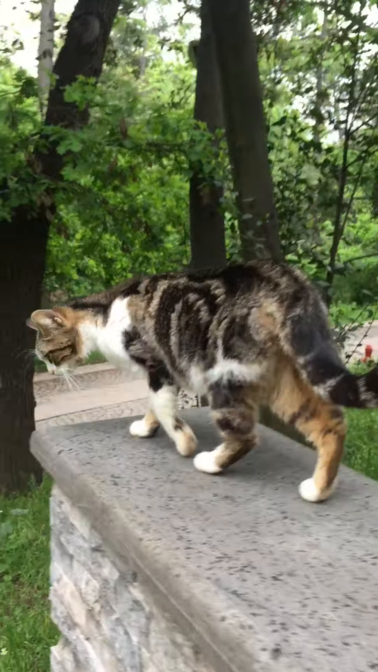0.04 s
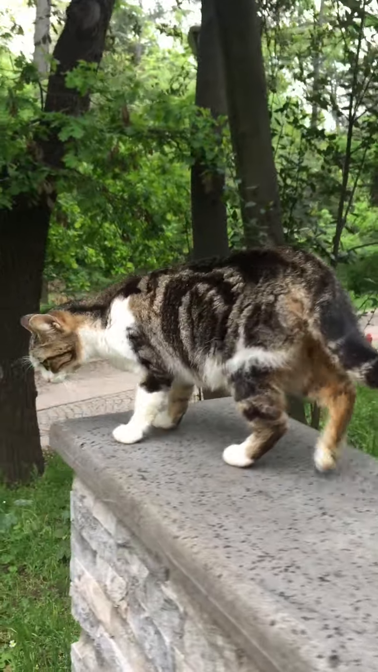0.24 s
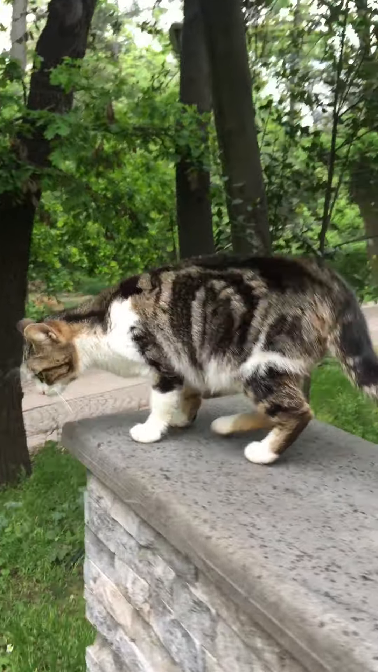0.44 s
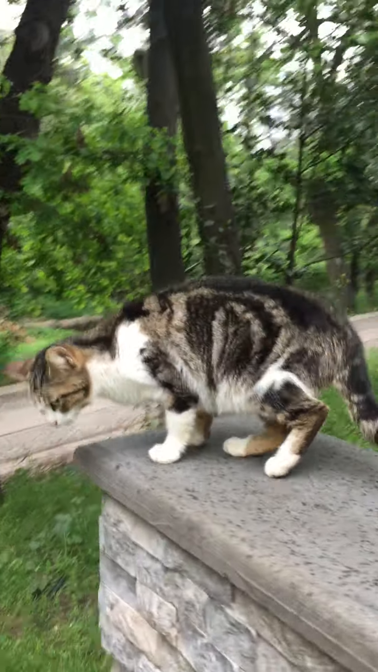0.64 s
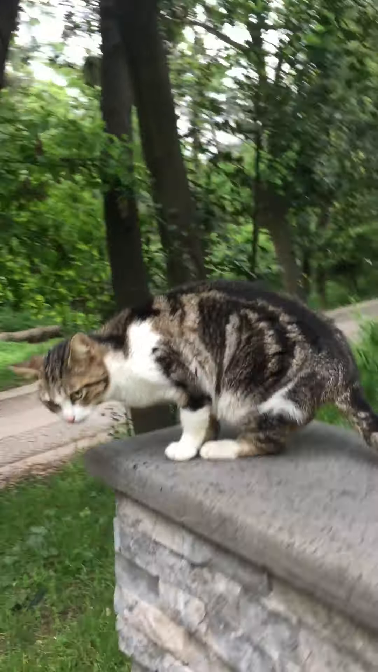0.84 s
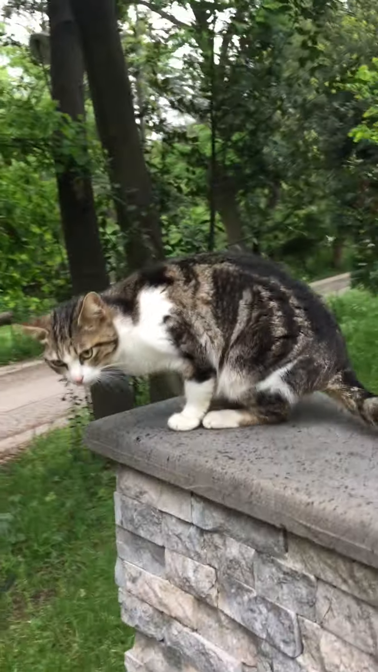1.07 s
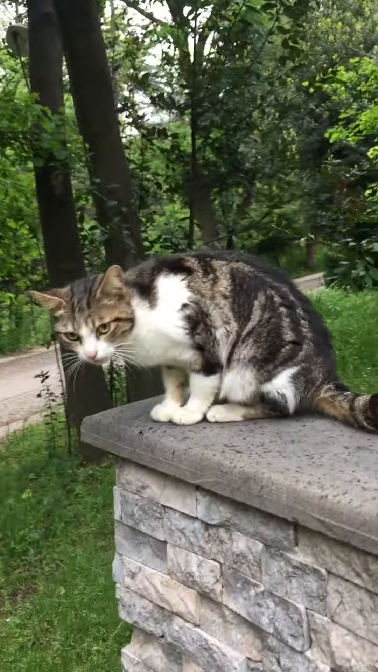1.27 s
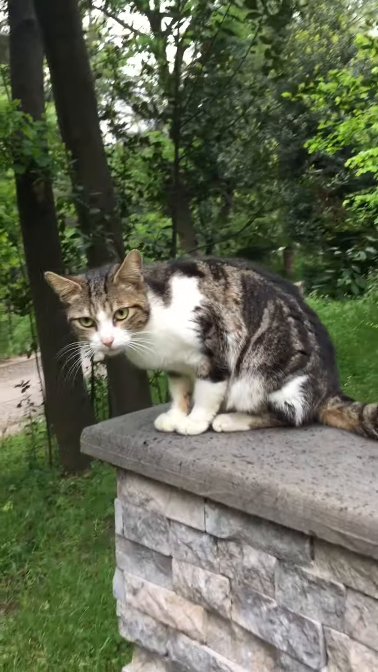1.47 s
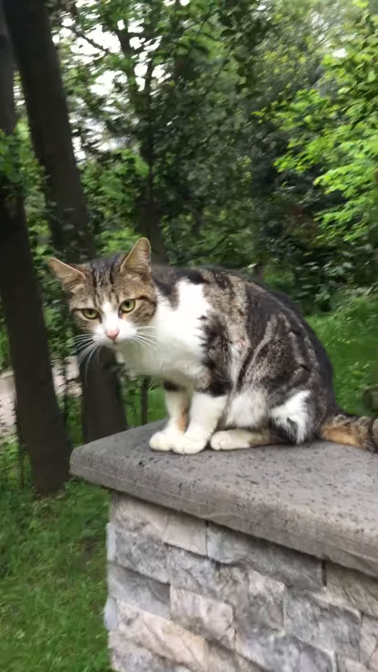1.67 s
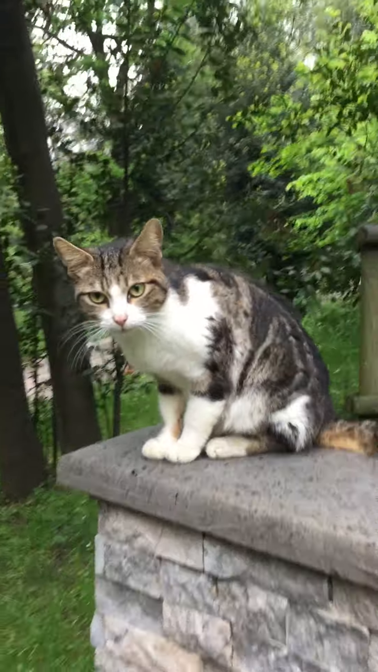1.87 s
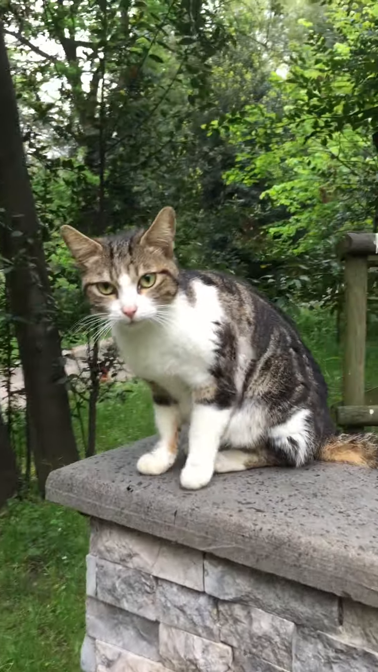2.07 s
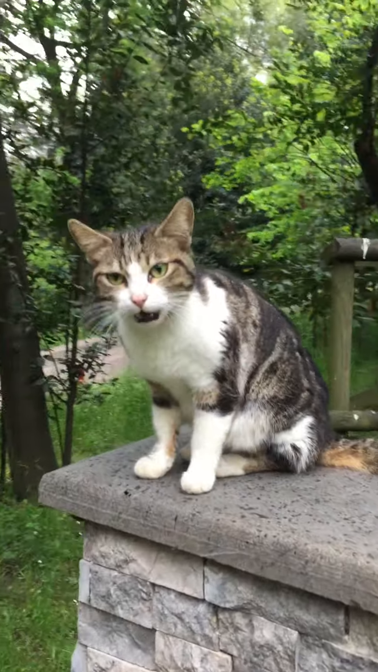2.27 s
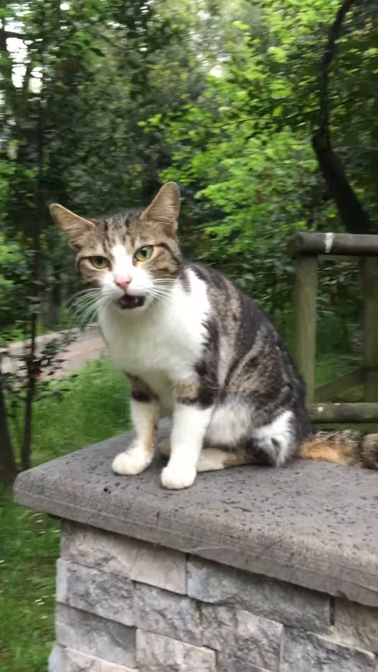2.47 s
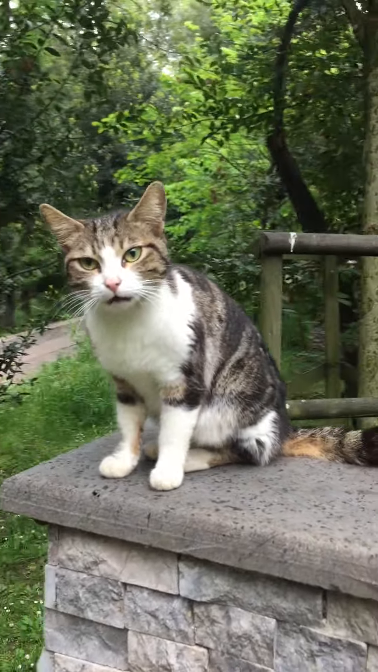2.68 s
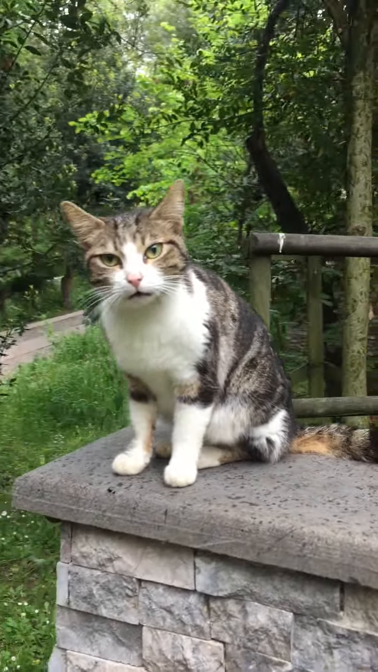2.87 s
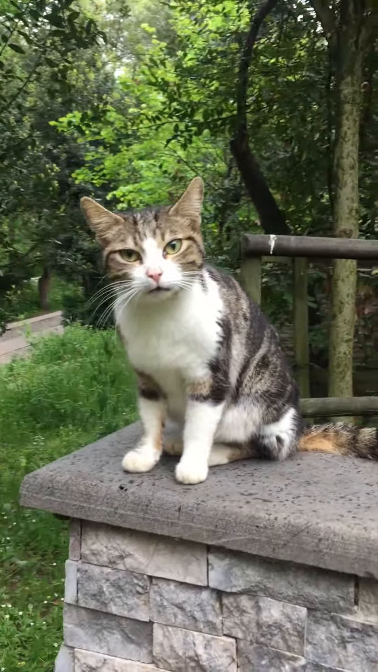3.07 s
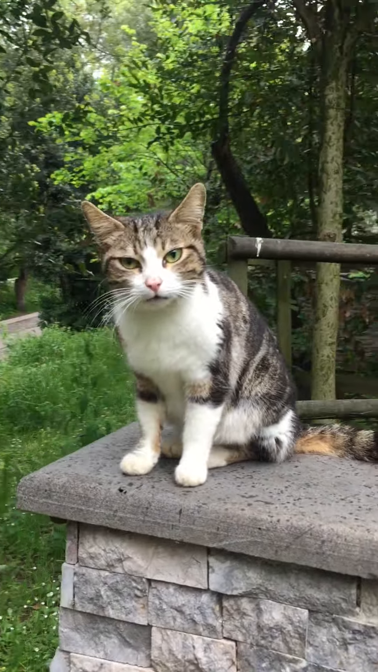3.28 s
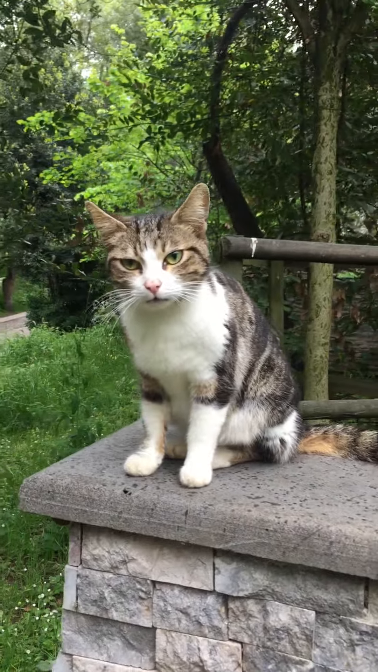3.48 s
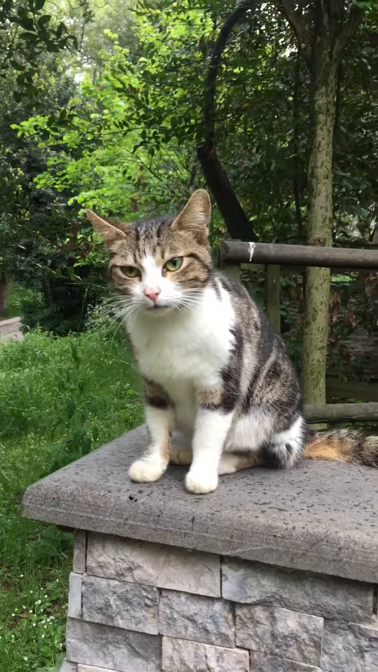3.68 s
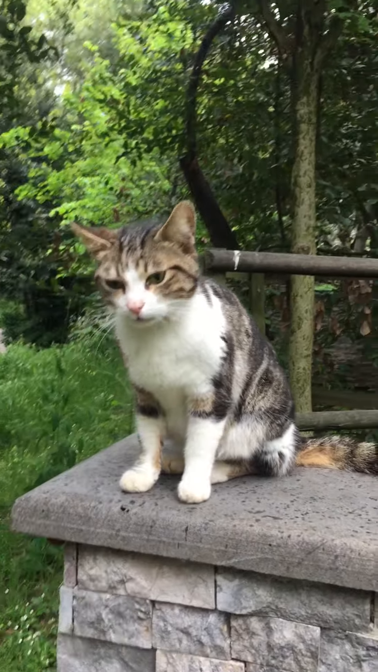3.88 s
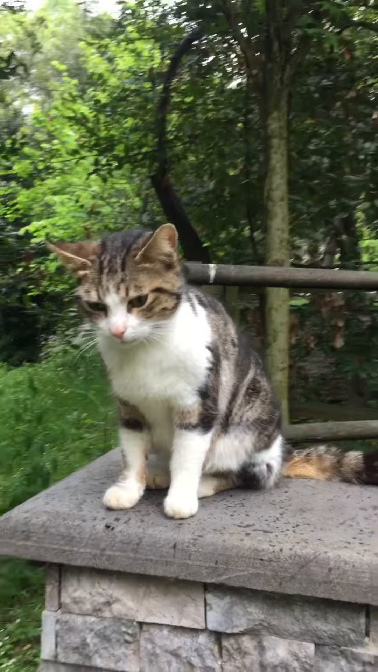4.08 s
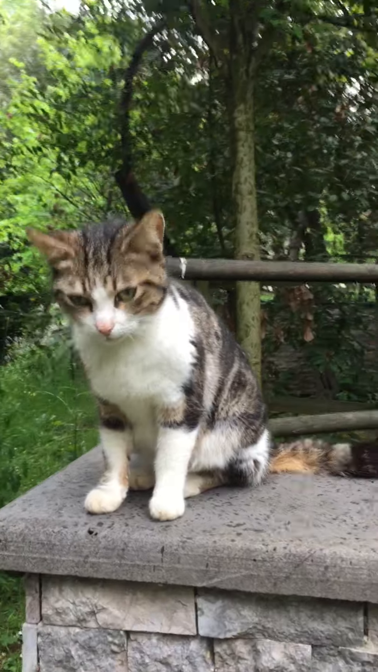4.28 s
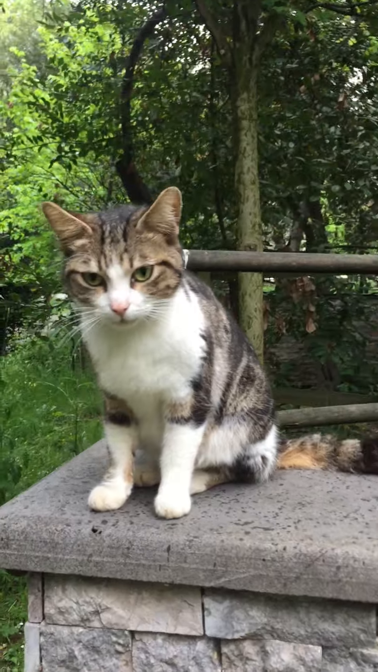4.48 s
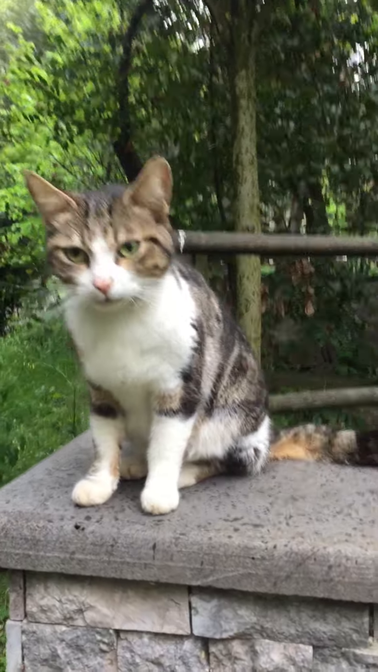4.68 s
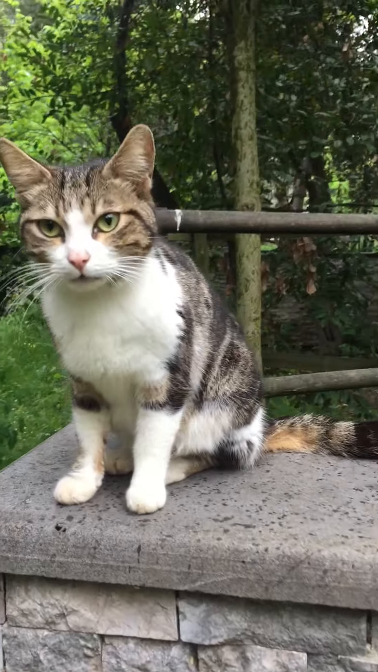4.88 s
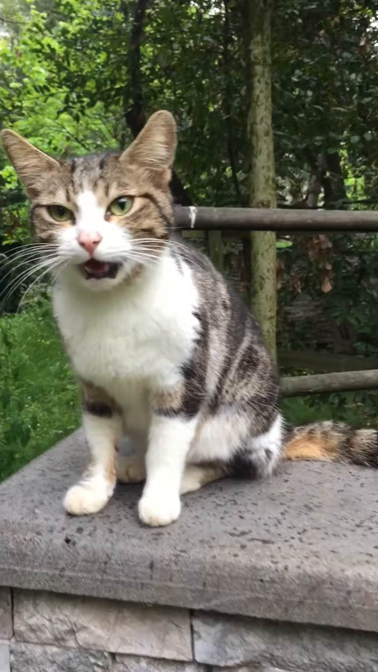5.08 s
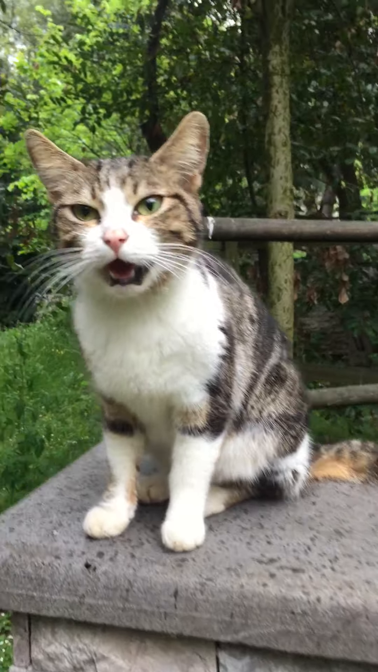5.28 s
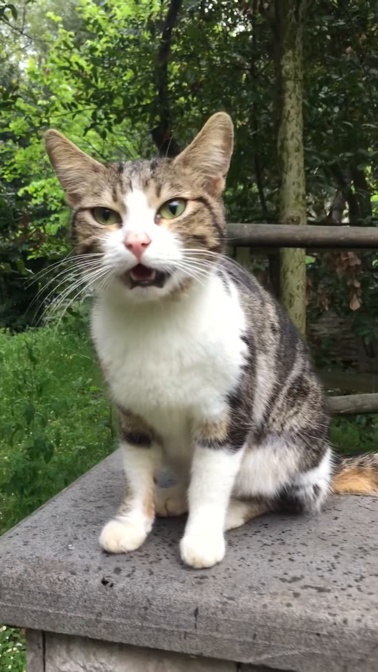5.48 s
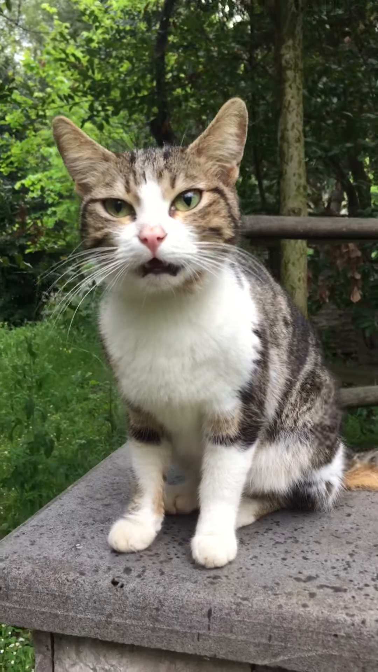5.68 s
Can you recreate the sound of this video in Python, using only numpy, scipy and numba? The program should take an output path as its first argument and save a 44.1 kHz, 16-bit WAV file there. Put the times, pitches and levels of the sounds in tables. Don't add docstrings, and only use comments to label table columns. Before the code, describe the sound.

A quiet park with a steady, soft low rumble of far traffic, faint wavering engine drones and gear whine. A tiny tick opens it, and a very thin high bird whistle comes at about 0.8 s. From 1.3 to 2.2 s a bird gives four short, slightly falling notes, the middle two clearer, with little chips among them. A small lip tick at 2.36 s leads into the cat's first meow, 2.4 to 3.0 s: close, low, rough and creaky, rising briefly, then sinking to a croak with a soft lip smack. Faint leaf stirs and chips follow, with a high bird chip and whistle near 4.2 s. From 4.6 s a low lorry idle slowly nears. Faint sniffs of drawn breath at 5.0 and 5.2 s precede the second meow at 5.26 s: louder, higher, pinched at first, then wide open and raspy, sagging in pitch until the abrupt end around 5.7 s.

```python
import sys
import numpy as np
from scipy import signal
from scipy.fft import rfft, irfft, next_fast_len
from scipy.io import wavfile
from scipy.ndimage import uniform_filter1d
from numba import njit

SR = 44100
rng = np.random.default_rng(int(sys.argv[2]) if len(sys.argv) > 2 else 0)


def pcm_store(signal):
    levels = np.round(np.clip(np.atleast_2d(signal), -1, 1) * 32767)
    wavfile.write(sys.argv[1], SR, levels.astype(np.int16).T)


def gain_from_db(level_db):
    decades = np.asarray(level_db, float) / 20
    return 10 ** decades


N = 253134
T = np.arange(N) / SR

# start in seconds, end in seconds.
MEOW_SPANS = [(2.412, 2.97), (5.264, 5.74)]
# time in seconds, fold pulse rate in Hz.
PITCH = [
    [(2.412, 222.2), (2.458, 234.9), (2.52, 237.3), (2.548, 280), (2.672, 261.5), (2.748, 190.8),
     (2.81, 191.5), (2.844, 154.6), (2.97, 154.4)],
    [(5.264, 306), (5.306, 324.6), (5.344, 290.3), (5.53, 274.8), (5.56, 251.2), (5.588, 252),
     (5.646, 210.8), (5.69, 206.5), (5.74, 165)],
]
# time in seconds, level in dB, press in dB (how hard the folds snap shut).
EFFORT = [
    [(2.412, -72, 3), (2.426, -57, 7), (2.448, -48, 0.5), (2.642, -46, -3), (2.726, -47, -14),
     (2.838, -49, -18.5), (2.884, -56, -12), (2.94, -51.5, -26), (2.97, -59, -1)],
    [(5.264, -64.5, 1.5), (5.298, -50.5, 4), (5.322, -44.5, -1), (5.37, -41.5, 0.6), (5.534, -40, -3),
     (5.625, -40.5, -6.5), (5.676, -42.5, -7), (5.712, -45, -8.5), (5.74, -47.5, -7.5)],
]
# time in seconds, lip rounding 0-1, jaw opening 0-1.
MOUTH_SHAPE = [
    [(2.412, 0.1, 0), (2.482, 0.3, 0.18), (2.62, 0.28, 0.79), (2.736, 0.83, 0.95), (2.902, 1, 0.56),
     (2.97, 1.02, 0.5)],
    [(5.264, 0, .01), (5.304, .01, .01), (5.372, 0, 0.21), (5.496, 0.33, 0.37), (5.556, 0.29, 0.9),
     (5.74, 0.7, .98)],
]
# start in Hz, end in Hz, width in Hz, level in dB under the fourth resonance.
UPPER_MOUTH = [
    [(5450, 6150, 1300, -4), (6800, 6700, 1400, -3.5), (7600, 8400, 1400, -6.5), (9500, 9800, 1100, -14)],
    [(5300, 4120, 900, -7), (6940, 6000, 890, -2.5), (8540, 7200, 650, -7.5), (8550, 8260, 1600, -10)],
]
# throat resonance in Hz, fourth resonance in Hz with the jaw shut.
TRACT = [(1030, 4110), (1080, 3900)]
STEADY = [(.014, .13), (.006, .06)]
# time in seconds, half length in seconds, extra period scatter share.
STUMBLES = [(2.42, .04, .022), (2.49, .02, .022), (2.54, .035, .07), (2.61, .04, .06), (2.705, .045, .05),
            (2.78, .028, .03), (2.97, .15, .08), (5.26, .09, .045), (5.422, .017, .075), (5.465, .014, .03),
            (5.5, .014, .05), (5.648, .018, .035), (5.74, .04, .045)]
# held in seconds, strength 0-1, stall depth in dB.
PINCH = [(0.001, .3, 6), (0.034, .98, 14)]
# centre in Hz, width in Hz, level in dB.
TEETH_HISS = [(11250, 840, -40), (13000, 900, -37), (14900, 1500, -41)]
# ring in Hz, width in Hz, level in dB.
LIP_SMACK = [(380, 37, -49.5), (1860, 1200, -55.5), (4290, 100, -59), (6400, 2100, -61.5)]
# time and rise in seconds, centre and width in Hz, dB.
INTAKE = [
    (5.019, .006, 4400, 9100, -66),
    (5.2, 0.027, 3620, 1800, -68.5),
]
# start in seconds, start pitch in Hz, level in dB.
CALLS = [
    (1.305, 2070, -62),
    (1.571, 2037, -55.5),
    (1.87, 2022, -55),
    (2.151, 2020, -60.5),
]
# start in seconds, start pitch in Hz, level in dB.
CHIPS = [
    (1.623, 1926, -57),
    (1.93, 2860, -72),
    (3.13, 2850, -70),
    (3.449, 2800, -70),
    (4.052, 3180, -62.5),
    (4.192, 7600, -63),
]
# start in seconds, start pitch in Hz, glide share, level in dB.
SEEPS = [
    (.823, 7700, .003, -65),
    (0.899, 7570, -0.0028, -73),
    (4.159, 7530, 0.0042, -64),
]
# time in seconds, centre in Hz, width in Hz, level in dB.
TICKS = [(.0036, 3600, 15000, -63), (.25, 11000, 4000, -73), (.655, 5800, 2500, -74),
         (2.36, 2750, 397, -65), (2.362, 11500, 3100, -67), (2.366, 4640, 5000, -68.5),
         (3.067, 804, 900, -59), (3.985, 5300, 3000, -75), (4.841, 5400, 6000, -66),
         (5.525, 13900, 3000, -70)]
# time in seconds, centre in Hz, width in Hz, level in dB.
STIRS = [(2.9, 3700, 810, -65), (3.0, 6300, 380, -73.5), (3.76, 6800, 900, -80), (4.06, 3600, 590, -69.5)]
# start in seconds, end in seconds, pitch in Hz, level in dB.
DRONES = [(-.2, .3, 185, -58), (1.2, 1.6, 285, -60), (2.6, 3.0, 298, -60), (2.7, 2.88, 193, -53),
          (3.7, 4.35, 192, -53), (.72, .88, 435, -63), (-.2, .7, 1080, -68), (.75, 1.05, 1190, -68),
          (1.06, 1.45, 1040, -68), (1.75, 2.5, 1000, -69), (3., 3.6, 965, -72), (.3, .9, 720, -72),
          (1.3, 1.6, 780, -70), (1.74, 1.94, 1520, -70), (.45, .75, 1620, -72), (1.02, 1.13, 1800, -71),
          (1.12, 1.3, 1460, -73), (3.2, 3.5, 1380, -74), (3.9, 4.3, 1400, -73)]
# frequency in Hz, level in dB per Hz.
TOWN_COLOUR = [(12, -62), (20, -33), (30, -48), (45, -2), (92, 1), (126, -6.5), (171, -7.5), (252, -10.5),
               (478, -25), (746, -27.5), (958, -24.5), (1270, -28.5), (2840, -43), (3080, -45.5),
               (15500, -59)]

THROAT_WIDTH_HZ, THROAT_SKIRT_HZ = (232, 115, 250), (440, 1600, 1100)
CHEST_HZ, CHEST_WIDTH_HZ, CHEST_DB = 560, 200, -17
FOURTH_WIDTH_HZ, FOURTH_OPEN_HZ = 260, 363
FOURTH_KEEPS = .25
SPREAD_HZ, ROUND_HZ = (1993, 3040), (1637, 2670)
TOP_SHUT_HZ, TOP_OPEN_HZ = 6560, 11500
OVER_DB, PRESS_SHARES = (3.5, 0, -3), (0.58, 0.51, 1)
WAVER_DB, WAVER_SHARE = 1.2, .005
RASP_SHARES, RASP_CYCLE = (.48, .4), .13
SIZE_DB, SIZE_DB_PER_SCATTER, BREATH_PER_SCATTER = .5, 22, 1.5
PINCH_RELEASE_S, PINCH_DB, PINCH_SHIFTS = .02, (11, 9), (-0.072, 0.066, -0.11, 0.18)
STALL_PERIOD_S, STALL_SETTLE_S = .0093, 0.017
WALL_LAG_S, WALL_DB = 0.00128, -18
ECHO_T60_S, ECHO_DB = .3, -22
CALL_S, CALL_GLIDE, CALL_OVER_DB = 0.079, -0.0432, -21.5
CHIP_S, CHIP_GLIDE, CHIP_OVER_DB = 0.035, -0.088, -30
SEEP_S, SEEP_OVER_DB, WARBLE_SHARE = 0.088, -40, .005
SMACK_S, SMACK_RISE_S, SMACK_FALL_S = 2.966, 0.014, 0.015
TICK_RISE_S, TICK_FALL_S, STIR_S, INTAKE_FALL_S = 0.0032, 0.0048, 0.021, 0.16
LORRY_FROM_S, LORRY_HZ, LORRY_DB, LORRY_DB_PER_S = 4.58, 69.6, -52, 3
TOWN_DB, DRONE_SAG, DRONE_WIDTH = -46.5, .04, .065
MIC_DIP_HZ, MIC_DIP_WIDTH_HZ, MIC_DIP_DEPTH = 10440, 610, 0.64


def unit(x):
    return x / np.sqrt(np.mean(x ** 2))


def read(table, t):
    s, *columns = np.transpose(table)
    return [np.interp(t, s, c) for c in columns]


def walk(rate):
    hold = int(SR / rate)
    steps = np.repeat(rng.standard_normal(N // hold + 1), hold)
    return unit(uniform_filter1d(uniform_filter1d(steps, hold), hold)[:N])


@njit
def svf(x, hz, width):
    band, low, b, l = np.empty(len(x)), np.empty(len(x)), 0., 0.
    for i in range(len(x)):
        g, k = np.tan(np.pi * hz[i] / SR), width[i] / hz[i]
        v = (b + g * (x[i] - l)) / (1 + g * (g + k))
        band[i], low[i] = k * v, l + g * v
        b, l = 2 * v - b, l + 2 * g * v
    return band, low


def ring(x, hz, width_hz):
    return svf(x, hz + 0 * x, width_hz + 0 * x)[0]


def resonance(x, hz, width_hz, skirt_hz):
    return unit(ring(ring(x, hz, width_hz), hz, skirt_hz))


@njit
def folds(hz, scatter, size_db, chance):
    pulses, phase, p, k = np.zeros(len(hz) + 1), np.empty(len(hz)), .9, 0
    for i in range(len(hz)):
        step = hz[i] * np.exp(scatter[i] * chance[k, 0]) / SR
        p += step
        if p >= 1:
            p, k = p - 1, k + 1
            size = 10 ** (size_db[i] * chance[k, 1] / 20) * np.sqrt(SR / hz[i])
            pulses[i] += size * p / step
            pulses[i + 1] += size * (1 - p / step)
        phase[i] = p
    return pulses[:-1], phase


def fold_sound(t, pitch, steady, rasp_share):
    scatter = steady[0]
    for s, half, more in STUMBLES:
        scatter = scatter + more * np.clip(1 - np.abs(t - s) / half, 0, 1)
    size_db = SIZE_DB + SIZE_DB_PER_SCATTER * scatter
    breath = steady[1] + BREATH_PER_SCATTER * scatter
    pulses, phase = folds(read(pitch, t)[0], scatter, size_db, rng.standard_normal((400, 2)))
    air = breath * rng.standard_normal(len(t)) * 2 * np.exp(-phase / .8)
    drive = pulses + air
    rasp = unit(rng.standard_normal(len(t)) * np.exp(-phase / RASP_CYCLE))
    spit = (1 - rasp_share) * drive + rasp_share * rasp
    return drive, air, spit


def throat_sound(drive, centres, levels_db):
    throat = 0
    for k in range(3):
        tone = resonance(drive, centres[k], THROAT_WIDTH_HZ[k], THROAT_SKIRT_HZ[k])
        throat = throat + (-1) ** k * gain_from_db(levels_db[k]) * tone
    chest = resonance(drive, CHEST_HZ, CHEST_WIDTH_HZ, CHEST_WIDTH_HZ)
    return throat - gain_from_db(levels_db[0] + CHEST_DB) * chest


def mouth_sound(drive, air, spit, hz4, press_db, opening, upper_mouth):
    lips = -gain_from_db(-FOURTH_KEEPS * press_db) * resonance(drive + spit, hz4, FOURTH_WIDTH_HZ, 1100)
    for k, (start_hz, end_hz, width_hz, db) in enumerate(upper_mouth):
        tongue = 1 + 0.034 * walk(11.8)[:len(air)]
        hz = np.linspace(start_hz, end_hz, len(air)) * tongue
        lips += (-1) ** k * gain_from_db(db) * resonance(spit, hz, width_hz, 2 * width_hz)
    top_hz = TOP_SHUT_HZ + (TOP_OPEN_HZ - TOP_SHUT_HZ) * np.clip(opening, 0, 1)
    for _ in range(4):
        lips = svf(lips, top_hz, top_hz)[1]
    hiss = sum(gain_from_db(db) * resonance(air, hz, width_hz, width_hz) for hz, width_hz, db in TEETH_HISS)
    return unit(lips) + hiss


def meow(span, pitch, effort, shape, upper_mouth, rasp_share, steady, tract, pinch):
    t = T[int(span[0] * SR):int(span[1] * SR)]
    since = t - span[0]
    held_s, strength, stall_db = pinch
    pinched = strength * np.clip(1 - (since - held_s) / PINCH_RELEASE_S, 0, 1)

    db1, press_db = read(effort, t)
    db2, db3, mouth_db = (db1 + db + share * press_db for db, share in zip(OVER_DB, PRESS_SHARES))
    db2 = db2 + PINCH_DB[0] * pinched + WAVER_DB * walk(25.7)[:len(t)]
    db3 = db3 + PINCH_DB[1] * pinched + WAVER_DB * walk(25.7)[:len(t)]

    rounding, opening = read(shape, t)
    hz2, hz3 = (a + (b - a) * rounding for a, b in zip(SPREAD_HZ, ROUND_HZ))
    at_rest = (tract[0], hz2, hz3, tract[1] + FOURTH_OPEN_HZ * opening)
    hz1, hz2, hz3, hz4 = (hz * (1 + shift * pinched + WAVER_SHARE * walk(24.3)[:len(t)])
                          for hz, shift in zip(at_rest, PINCH_SHIFTS))

    drive, air, spit = fold_sound(t, pitch, steady, rasp_share)
    voice = throat_sound(drive, (hz1, hz2, hz3), (db1, db2, db3))
    voice += gain_from_db(mouth_db) * mouth_sound(drive, air, spit, hz4, press_db, opening, upper_mouth)
    hole_hz = 0.41 * hz3 + 0.61 * hz4
    voice -= np.linspace(.45, .99, len(t)) * ring(voice, hole_hz, 800)
    for hz in (1300., 2500., 4500.):
        voice = voice - 2 * ring(voice, hz, hz / 2)

    stall = stall_db * np.exp(-since / STALL_SETTLE_S) * (1 - 2 * (since / STALL_PERIOD_S % 1))
    voice *= uniform_filter1d(gain_from_db(stall) * (since > .0005), size=36)
    fade = np.clip((span[1] - t) / 0.0067 + (span[1] > T[-1]), 0, 1)
    out = np.zeros(N)
    out[int(span[0] * SR):][:len(t)] = -voice * fade
    return out + gain_from_db(WALL_DB) * np.interp(T - WALL_LAG_S, T, out)


def birds():
    notes = [(s, CALL_S, hz, CALL_GLIDE, db, CALL_OVER_DB) for s, hz, db in CALLS]
    notes += [(s, CHIP_S, hz, CHIP_GLIDE, db, CHIP_OVER_DB) for s, hz, db in CHIPS]
    notes += [(s, SEEP_S, hz, glide, db, SEEP_OVER_DB) for s, hz, glide, db in SEEPS]
    out = np.zeros(N)
    for s, length, hz, glide, db, over_db in notes:
        u = np.arange(int(length * SR)) / (length * SR)
        pitch = hz * (1 + glide * u + WARBLE_SHARE * walk(165)[:len(u)])
        turn = 2 * np.pi * np.cumsum(pitch) / SR
        tone = np.sin(turn) + gain_from_db(over_db) * np.sin(2 * turn)
        out[int(s * SR):][:len(u)] += gain_from_db(db) * np.sin(np.pi * u) ** .6 * tone
    return out * gain_from_db(2.2 * walk(90))


def small_noises():
    rows = [(s, TICK_RISE_S, TICK_FALL_S, *band) for s, *band in TICKS]
    rows += [(SMACK_S, SMACK_RISE_S, SMACK_FALL_S, *band) for band in LIP_SMACK]
    rows += [(s, STIR_S, STIR_S, *band) for s, *band in STIRS]
    rows += [(s, rise, INTAKE_FALL_S, *band) for s, rise, *band in INTAKE]
    out = np.zeros(N)
    for s, rise, fall, hz, width_hz, db in rows:
        swell = np.exp(np.where(T < s, (T - s) / rise, (s - T) / fall))
        out += gain_from_db(db) * swell * resonance(rng.standard_normal(N), hz, width_hz, width_hz)
    return out


def lorry():
    since = T - LORRY_FROM_S
    db = LORRY_DB + LORRY_DB_PER_S * since + 1.2 * walk(7.3)
    hz = LORRY_HZ * (1 + 0.024 * walk(5.7))
    tone = np.sin(2 * np.pi * np.cumsum(hz) / SR)
    return np.sqrt(2) * np.clip(since / .1, 0, 1) * gain_from_db(db) * tone


def drones():
    out = np.zeros(N)
    for start, end, hz0, db in DRONES:
        swell = np.clip(np.minimum(T - start, end - T) / 0.048, 0, 1)
        hz = np.interp(T, [start, end], [hz0, hz0 * (1 - DRONE_SAG)]) * (1 + .012 * walk(12))
        swell *= gain_from_db(2.5 * walk(18))
        width_hz = hz0 * DRONE_WIDTH
        out += gain_from_db(db) * swell * resonance(rng.standard_normal(N), hz, width_hz, width_hz)
    return out


def town():
    size = next_fast_len(N)
    f = np.fft.rfftfreq(size, 1 / SR) + 1
    hz, db = np.transpose(TOWN_COLOUR)
    spectrum = rfft(rng.standard_normal(size)) * gain_from_db(np.interp(np.log(f), np.log(hz), db))
    third, out = 3 * np.log2(f / 20), 0
    for k in range(30):
        share = np.clip(1 - np.abs(third - k), 0, 1)
        patchy_db = 2.8 if 12 < k < 20 else 1.1
        out = out + gain_from_db(patchy_db * walk(7)) * irfft(spectrum * share, size)[:N]
    return unit(out) * gain_from_db(TOWN_DB)


def echo(near):
    t = T[:SR // 2]
    scatter = rng.standard_normal(len(t)) * gain_from_db(-60 * t / ECHO_T60_S) * (t > .008)
    return signal.fftconvolve(near, scatter / np.sqrt(np.sum(scatter ** 2)))[:N]


def scene():
    calls = zip(MEOW_SPANS, PITCH, EFFORT, MOUTH_SHAPE, UPPER_MOUTH, RASP_SHARES, STEADY, TRACT, PINCH)
    near = sum(meow(*call) for call in calls) + birds()
    far = town() + drones() + lorry()
    return (near + gain_from_db(ECHO_DB) * echo(near) + small_noises() + far)[None]


def roll_off(x):
    return signal.sosfilt(signal.butter(12, 15820, fs=SR, output="sos"), x)


def record(dry):
    swallowed = MIC_DIP_DEPTH * ring(dry[0], MIC_DIP_HZ, MIC_DIP_WIDTH_HZ)
    heard = dry[0] - swallowed
    return roll_off(heard[None])


dry = scene()
out = record(dry)
pcm_store(out)
```